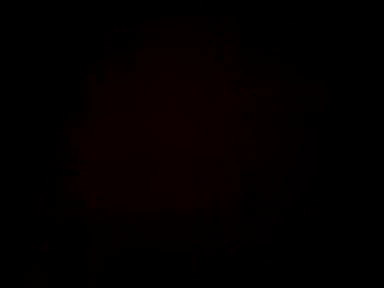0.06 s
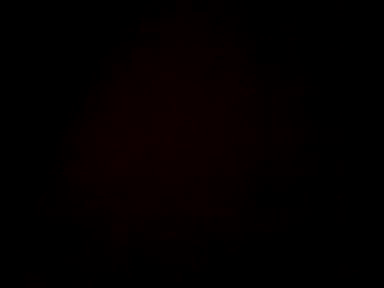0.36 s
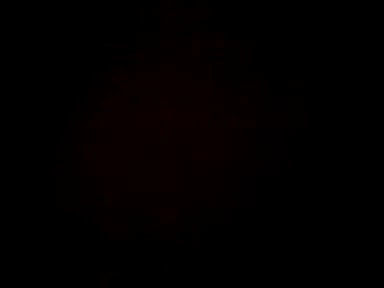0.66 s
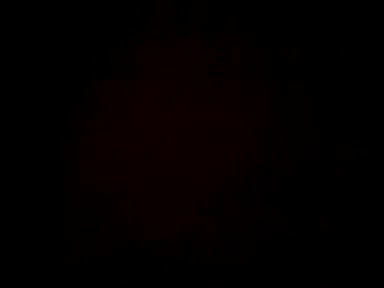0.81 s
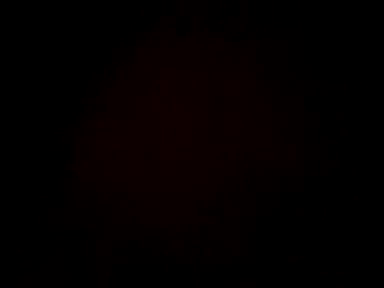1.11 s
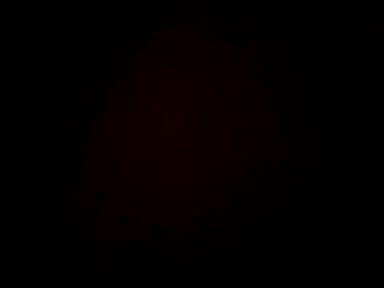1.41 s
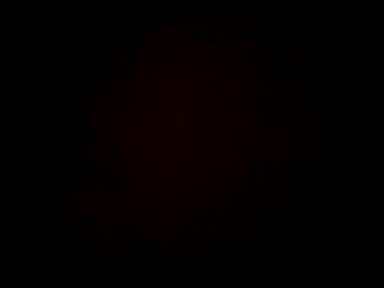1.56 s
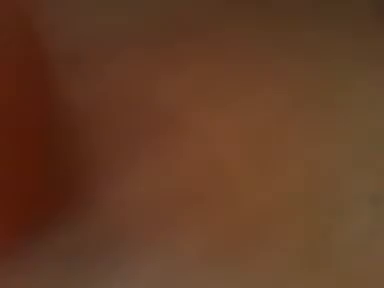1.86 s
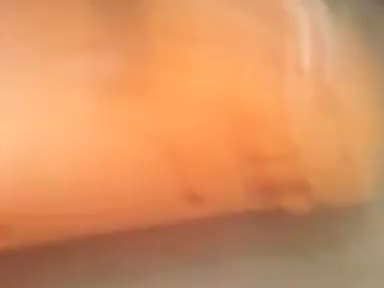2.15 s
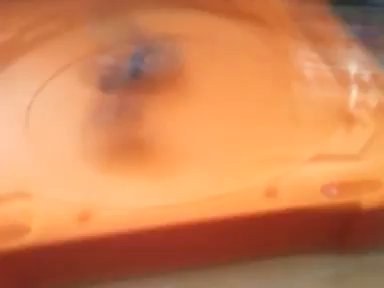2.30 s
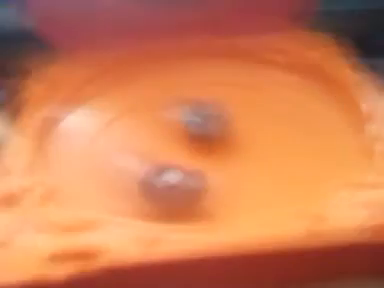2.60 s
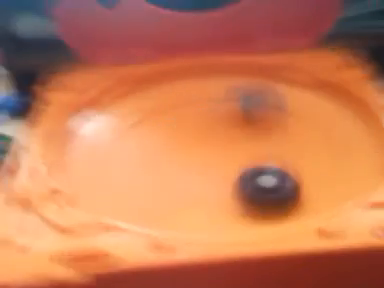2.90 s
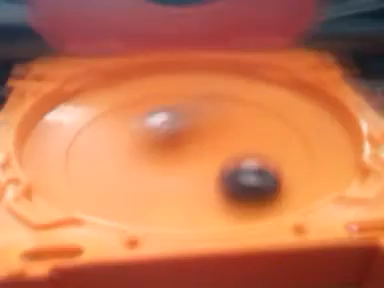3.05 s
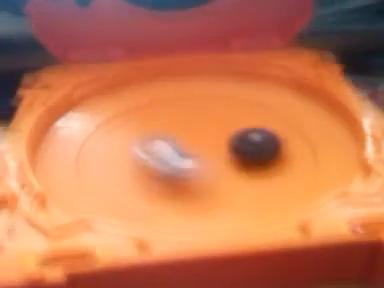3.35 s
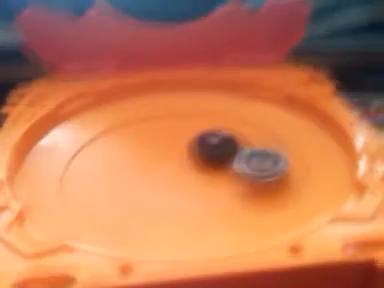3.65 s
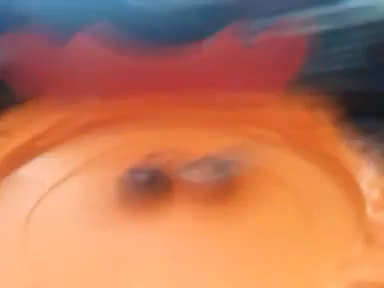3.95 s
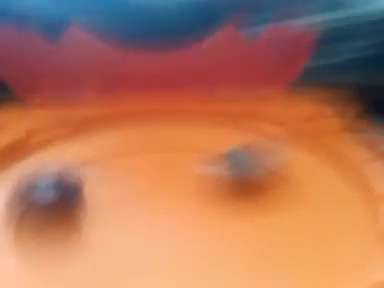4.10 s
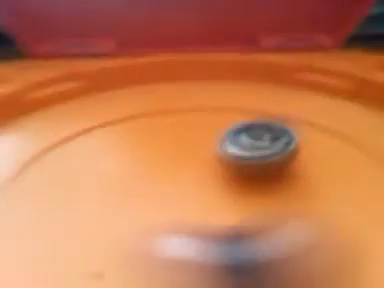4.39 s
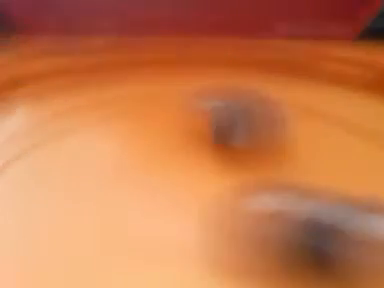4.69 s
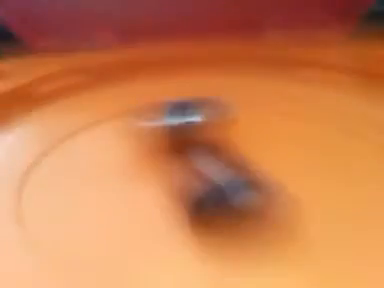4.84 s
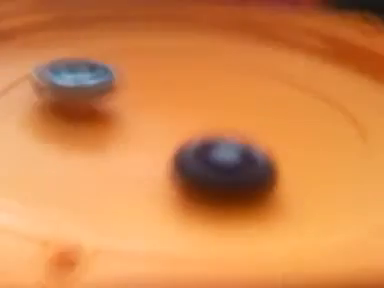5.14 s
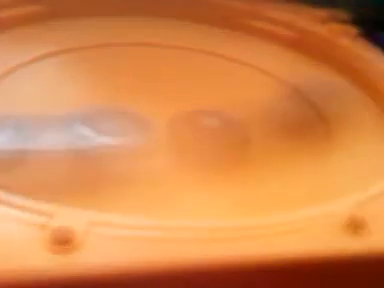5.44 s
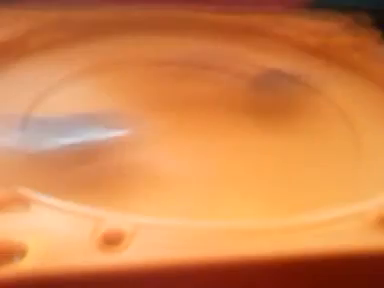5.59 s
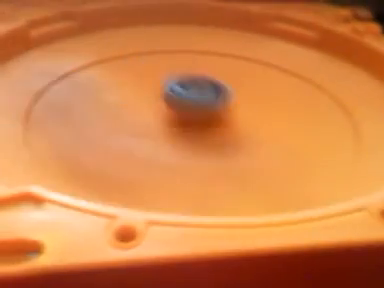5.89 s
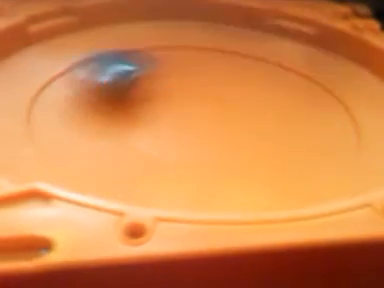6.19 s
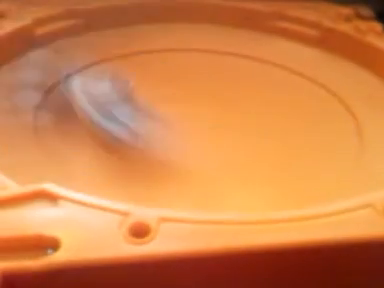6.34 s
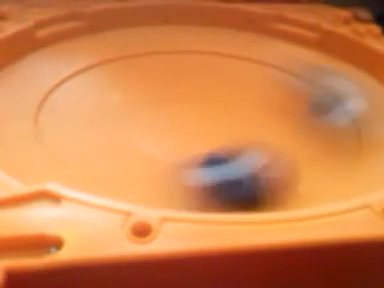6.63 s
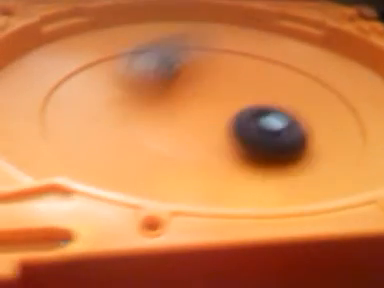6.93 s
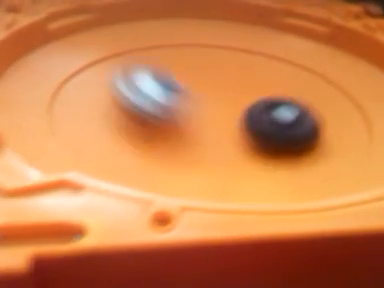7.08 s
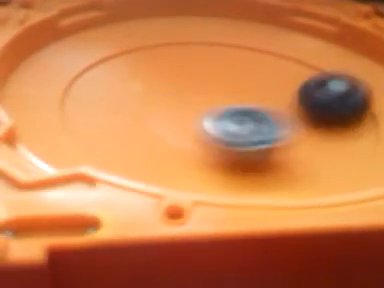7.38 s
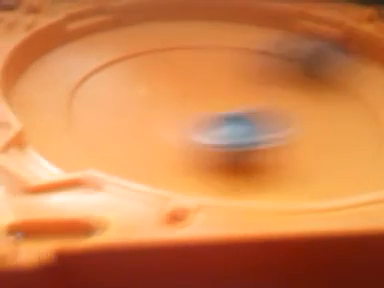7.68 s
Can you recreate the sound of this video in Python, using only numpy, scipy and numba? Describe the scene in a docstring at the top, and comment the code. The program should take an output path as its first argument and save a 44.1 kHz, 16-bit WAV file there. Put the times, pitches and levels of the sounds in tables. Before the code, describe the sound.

A few light knocks and a short, loud ripcord zip launch two metal spinning tops into a plastic arena. They clash rapidly with hollow clacks, ease into a drumming whirr with little skipping rattles, then collide again in further flurries before thinning to occasional knocks. The microphone is close in a small, quiet room, and the sound is narrow, with little treble.

```python
"""Two metal spinning tops clash and skip in a plastic arena, ripped off a launcher's toothed cord.
Each impact excites the damped modes of the plastic bowl, and the tops rebound in ever shorter hops.
Between blows their tips tap the floor once a turn and rub, a periodic force that drums the bowl.
A small room reverberates. A close phone keeps a narrow voice band and clips on the hardest blows."""
import sys
import numpy as np
from scipy import signal
from scipy.fft import rfft, irfft
from scipy.io import wavfile
from scipy.ndimage import uniform_filter1d
from numba import njit

SR = 44100
rng = np.random.default_rng(int(sys.argv[2]) if len(sys.argv) > 2 else 0)


def wav_out(sig):
    """Save sig, one row per channel (or a flat mono array), as 16-bit PCM at SR to the path in sys.argv[1]."""
    wavfile.write(sys.argv[1], SR, np.round(np.clip(np.atleast_2d(sig).T, -1, 1) * 32767).astype(np.int16))


N = 342657
TIME = np.arange(N) / SR

# Knocks at the launch, then blows of the tops on each other and the bowl; floor blows thud more.
# Each row: start in seconds, contact time in ms, strongest mode in Hz, level in dB,
# brightness in dB per octave, thud in dB.
BLOWS = [(0.408, 5, 777, -29.5, -0.5, -0.5), (0.459, 9, 745, -38.5, -0.5, -29),
         (0.522, 6.3, 740, -25.5, -1, -15), (0.552, 4.0, 982, -28, 1, -17), (0.624, 11, 480, -5.0, 1, 9),
         (0.657, 6.0, 673, -11, -1.5, 3), (0.692, 7.1, 730.0, -21, 0.5, 15.5),
         (0.721, 10.0, 716, -19.5, -5.0, -2), (0.755, 16, 726, -19, -1, 3),
         (0.859, 6.6, 831, -15.5, -4.5, -2.5), (1.003, 16, 728, -13.5, 0, 4.5),
         (1.037, 26, 723.6, -18.5, 0, 5), (1.06, 8.7, 682, -8.0, -3, -7), (1.078, 9.8, 782, -7.5, 1, 3),
         (1.088, 9.0, 912, -6.5, -5.5, -5.5), (1.14, 14.0, 343, -12.5, 2.5, 8.5),
         (1.158, 1.3, 764, -17.5, 0, 7), (1.21, 15, 484, -14.5, 0.5, 3),
         (1.233, 5.2, 905, -6.5, -4.5, -1.5), (1.241, 5.4, 373, -4, 6, -2.5),
         (1.255, 8, 1118, -12.5, -8.5, 4), (1.269, 8.1, 398.5, -16.5, 0.5, -4.5),
         (1.395, 8.0, 809, -11.5, 2, 9.5), (1.404, 7.1, 758, -8.0, -4, 1.5),
         (1.417, 19, 666, -20.5, -1, -1.5), (1.441, 12, 670, -8.5, 0.5, 5.5),
         (1.476, 5.4, 720.0, -15, -5, 1.5), (1.539, 12, 728, -19, 1, 13),
         (1.579, 14.0, 1135, -10.0, -3.5, 5.5), (1.593, 18.0, 491, -15, 0, -3.5),
         (1.615, 28, 933, -19.5, -0.5, 4), (1.649, 6.4, 875, -8.5, -3.5, 3.5),
         (1.66, 10, 887, -9.0, 1, 3.5), (1.704, 14.0, 626, -26, 5.5, 4),
         (1.721, 7.4, 774, -13.5, -3, -15.5), (1.758, 10, 436, -18, -2.5, -6.5),
         (1.784, 9.0, 508, -10.5, -1.5, -2.5), (1.813, 9.8, 471, -29.5, -10, -8),
         (1.875, 7.2, 364, -16.5, -2.5, -0.5), (1.932, 13.0, 1795, -7.0, -3, -2),
         (1.945, 12, 507, -9.5, 3.5, 8.5), (1.995, 4, 527, -15.5, 1, 12.5),
         (2.053, 3.3, 450.0, -25, -2.5, 5.5), (2.109, 22, 506, -16, 1.5, 4),
         (2.148, 8.0, 438, -27, -1, 6.5), (2.266, 8.0, 444, -10.5, 0, 1.5),
         (2.347, 2.2, 1980, -11.0, -1, -4), (2.355, 6.3, 1073, -7.0, -0.5, 0),
         (2.481, 3, 693, -10, 1.5, 13), (2.49, 17, 643, -21.5, 2.5, -5.5), (2.7, 6.2, 2066, -30, 5.5, 24.5),
         (3.902, 6.9, 470, -15.5, 4, -5), (3.936, 7.0, 473, -18, 0, 6), (3.967, 12.0, 543, -11.5, 3, -3.5),
         (4.017, 7.5, 565, -18, -1.5, 2), (4.472, 4, 412, -14.0, 8.5, 23),
         (4.533, 9.0, 966, -12.0, -2.0, -15), (4.584, 7.0, 1070, -15.0, -3, 0.5),
         (4.83, 7.0, 517, -13.5, 5, 10), (4.876, 15, 410.0, -17, 1.0, -2.5),
         (5.296, 13.0, 490, -18, -2.5, -7), (5.338, 17, 544, -13.5, 5.5, 5),
         (5.368, 4.2, 1080, -11.0, -2, 1), (5.397, 6.9, 1897, -11.5, -1, -4.5),
         (5.407, 6.7, 1883, -11, -9, -16), (5.448, 24, 407, -16.5, 5.5, 2),
         (5.479, 9.0, 541, -9.5, 0.0, -7), (5.511, 8.7, 347, -23, 6.5, 8.5),
         (5.572, 7.0, 558, -11.5, -5.5, -8.5), (5.582, 6.3, 510, -10, 2, -14.5),
         (5.664, 8.5, 546, -11, 1, -12.5), (5.705, 11.0, 586, -10.5, 1.5, 11.5),
         (5.791, 16.0, 1448, -13.5, -1.5, -3), (5.837, 39, 1246, -23, 2.5, 3),
         (5.848, 6, 463, -16.0, -2, 3), (5.883, 21, 979, -20.5, -7, -11), (5.899, 8.0, 940, -11.5, 0.5, 0),
         (5.98, 10.0, 553, -18.5, -6.5, -14), (5.989, 9.4, 548, -11.5, 0.5, -10),
         (6.025, 8.6, 529, -11.0, -1.5, -15), (6.08, 14, 415, -15.0, 2, -12),
         (6.099, 5.9, 539, -10.5, -3.0, -14), (6.18, 6.8, 810, -10, -2, -3.5),
         (6.217, 4.6, 548, -11.5, -0.5, -19.5), (6.32, 8.9, 1175, -21.0, -3.5, -12.5),
         (6.35, 3.8, 880.0, -17, -1.0, -6.5), (6.563, 9.2, 445, -16.5, -1.0, 4),
         (6.699, 7.0, 568, -23, -6, -10.5), (7.155, 3, 450.0, -21.5, 6.5, 23.5),
         (7.289, 3.4, 427, -23.0, -1.5, 7), (7.452, 5.6, 392.5, -21.5, 10, 31.5)]
def clashes():
    """Impact excitation: each collision gives the bowl a brief, broadband push."""
    return impacts(BLOWS)


# Runs of hops of a knocked top. Each row: start in seconds, first hop in seconds, share kept by the
# next hop, number of landings, level in dB, fade in dB per landing, strongest mode in Hz,
# brightness in dB per octave.
SKIPS = [(.782, 0.019, .98, 3, -26, -3, 652, -1), (0.884, 0.026, 1, 4, -15, 5, 716, -0.5),
         (1.284, .03, .97, 4, -15, 2, 592, 1.5), (2.571, .059, .79, 6, -18, 1.7, 450, -.5),
         (2.796, .044, 0.81, 6, -24, 1, 515, -1), (3.633, .033, .88, 6, -21.5, 1.5, 428.4, 0),
         (4.058, .059, .74, 6, -16.5, 1.4, 402, 0), (4.621, 0.041, .78, 5, -16, 3, 411, 2.5),
         (4.928, .031, .98, 5, -18, 2.5, 417, 0), (6.237, .031, .9, 2, -21, 1.5, 385, 4),
         (6.381, 0.029, .8, 3, -22.5, 0.5, 514, 0.5), (6.501, .039, .85, 5, -23.5, .5, 450, 3),
         (7.49, .034, .6, 3, -17, 5, 463, 1), (7.596, .026, .9, 2, -18.5, 4.5, 440, -1.5)]
def skips(contact_ms=6.5, thud_db=0.5):
    """Inelastic rebound: as a top loses energy, its landings come sooner and weaker."""
    rows = []
    for start, hop_s, kept, count, db, fade_db, main_hz, bright_db in SKIPS:
        for k in range(round(count)):
            note_hz = main_hz * np.exp(0.11 * rng.standard_normal())
            rows.append((start, contact_ms, note_hz, db - fade_db * k, bright_db, thud_db))
            start += hop_s * kept ** k
    return impacts(rows)


def contact(length_s, main_hz, chatter_per_s=1500, crack_s=0.0094, main_width_hz=140):
    """Impulse response: a first touch and a fading chatter of rims ring the bowl and crack the metal."""
    t = TIME[:2048]
    spot, detune = rng.standard_normal((2, len(BOWL_MODES)))
    grit, crack = rng.standard_normal((2, len(t)))
    pressure = (t < length_s) * np.exp(-0.68 * t / length_s)
    force = undb(-7) * pressure * grit * (rng.random(len(t)) < chatter_per_s / SR)
    force[0] = 1
    # the spot that is struck weights the modes
    body = unit((np.sign(spot) + spot / 2) @ bowl(t, 0.044 * detune[:, None]))
    clatter = ring(force, body + undb(-8) * unit(crack * np.exp(-t / crack_s)))
    # one mode is kept ringing while the rims touch and dies when they part
    envelope = ring(np.abs(force), np.exp(-np.pi * main_width_hz * t))
    main = np.sin(2 * np.pi * main_hz * t) * envelope
    return unit(clatter) + undb(-5) * unit(main)


# Registers of a blow: thud, body, knock, clack, tick. Each row: lower edge in Hz, upper edge in Hz.
REGISTERS = [(110, 370), (370, 700), (700, 1300), (1300, 2300), (2300, 3650)]
def impacts(rows, register_db=(-4, 0.5, 1.5, 2.1, -0.5), fall_db_per_octave=6):
    """Spectral envelope: energy gathers near the strongest mode, tilted by each blow's brightness."""
    starts, contact_ms, mains_hz, level_db, bright_db, thud_db = np.transpose(rows)
    contact_s = np.maximum(contact_ms, 2) * 1e-3
    sounds = np.array([contact(s, hz) for s, hz in zip(contact_s, mains_hz)])
    shaped = 0
    for (lo, hi), trim_db in zip(REGISTERS, register_db):
        centre_hz = np.sqrt(lo * hi)
        db = level_db + trim_db + bright_db * np.log2(centre_hz / 1000)
        db -= fall_db_per_octave * np.abs(np.log2(centre_hz / mains_hz))
        if lo == REGISTERS[0][0]:
            db += thud_db
        part = band(sounds, lo, hi)
        strength = np.sqrt(np.sum(part ** 2, axis=1) / (contact_s * SR))
        shaped = shaped + part * (undb(db) / strength)[:, None]
    hits = np.zeros(N)
    for start, sound in zip((starts * SR).astype(int), shaped):
        hits[start:start + len(sound)] += sound[:N - start]
    # the whole arena rocks a little under the blows
    load = np.abs(band(hits, 130, 450, order=2))
    return hits + undb(-12) * band(load, 55, 97, order=2)


# Modes of the plastic bowl. Each row: frequency in Hz, bandwidth in Hz, relative level in dB.
BOWL_MODES = [(238, 110, -13), (316, 85, -2.5), (450, 109, -4.5), (570, 270, -2.5), (698, 160, -7),
              (881.5, 99, 1), (1018, 60, -2.5), (1185, 159, -2), (1477, 230, -0.5), (1780, 120, -5),
              (2120, 290, 2), (2315, 310, -6), (2639, 160, 0), (3160, 96, -9.5), (3670, 140, -34.5)]
def bowl(t, detune):
    """Damped free vibration: one decaying sine a mode, dying faster the wider its bandwidth."""
    hz, width, db = np.transpose(BOWL_MODES)[:, :, None]
    return undb(db) * np.sin(2 * np.pi * hz * (1 + detune) * t) * np.exp(-np.pi * width * t)


# Spectral envelope of the running tips. Each row: frequency in Hz, gain in dB.
TIP_SPECTRUM = [(30, -23.5), (100, -8.5), (160, -8.5), (205, 0.5), (300, 1), (520, -3.5), (750, -10),
                (1200, -6.5), (1500, -17), (2200, -12.5), (2800, -18.5), (3200, -22), (3600, -31.5),
                (4200, -38.5)]
# Hollow note of the floor where the tops run. Each row: time in seconds, frequency in Hz.
FLOOR_NOTE = [(1.7, 630), (2.2, 440), (3.3, 520), (3.7, 390), (4.6, 470), (5.2, 370), (5.9, 550),
              (6.5, 420), (7.7, 410)]
# Relative levels of the tips. Each row: time in seconds, drumming, rubbing and scratching in dB.
TIP_LEVELS = [(0.62, -41, -43, -35), (0.72, -31.5, -32, -49), (0.8, -30, -39, -45),
              (1.1, -32.5, -34.5, -60.5), (1.21, -35, -44, -34.5), (1.6, -42, -49, -50),
              (1.7, -29, -38, -50), (1.83, -36.5, -29.5, -44), (2.07, -40, -41.5, -40),
              (2.35, -40.5, -45.5, -55.5), (2.51, -41.5, -41, -48), (2.77, -33, -39, -43.5),
              (3.01, -37.5, -39, -49.5), (3.51, -40.5, -42, -49.5), (4.0, -37.5, -43, -44),
              (4.1, -34, -44, -46), (4.32, -31, -33, -39), (4.82, -29, -37.5, -43.5),
              (5.1, -31.5, -37, -43.5), (5.34, -36.5, -47, -49), (5.5, -29.5, -38, -35),
              (5.72, -37, -35, -46), (5.88, -34, -34.5, -41), (6.45, -32, -34.5, -44),
              (6.65, -35, -42, -46), (6.89, -33.5, -39.5, -44), (7.29, -33.5, -39, -48),
              (7.77, -33.5, -38, -46.5)]
def whirr(turns_per_s=122, spin_down_s=18.5):
    """Forced vibration: both tips drive the bowl, which drums, rubs and scratches."""
    spin = turns_per_s * np.exp(-TIME / spin_down_s)  # the steadier top slows by friction
    roaming = tip(tap_rate(), jitter=.05, scatter_db=2.46, rub_db=4, rub_turns=0.65)
    steady = tip(spin, jitter=.04, scatter_db=5.5, rub_db=-3, rub_turns=0.17)
    force = roaming + undb(-8) * steady
    # the circling tops cross nodes and antinodes, so each mode swells and fades on its own
    modes = sum(wander(6) * ring(force, unit(mode)) for mode in bowl(TIME[:2048], 0))
    sound = colour(unit(band(force, 40, 6200, order=1)) + undb(2) * unit(modes), TIP_SPECTRUM)
    sound += undb(1) * resonance(sound, curves(FLOOR_NOTE)[0], width_hz=130.)
    bands_hz = [(30, 700), (700, 1600), (1600, 4000)]
    running = 0
    for (lo, hi), db, trim_db in zip(bands_hz, curves(TIP_LEVELS), (2.5, 0, -1)):
        running += even(band(sound, lo, hi)) * undb(db + trim_db + wander(9))
    landed = np.clip((TIME - .61) / .02, 0, 1)
    return landed * running


def tip(rate_hz, jitter, scatter_db, rub_db, rub_turns):
    """Impulse train with friction noise: a tip taps once a cycle, then rubs until it lifts again."""
    chance = rng.standard_normal((1200, 2))
    cycle = np.cumsum(rate_hz) / SR
    cycle += jitter * np.interp(cycle, np.arange(len(chance)), chance[:, 0])
    count = np.clip(cycle.astype(int), 0, len(chance) - 1)
    size = undb(scatter_db * chance[count, 1])
    taps = np.diff(count, prepend=count[0]) * size
    rub = size * np.exp(-(cycle % 1) / rub_turns) * rng.standard_normal(N)
    return unit(taps) + undb(rub_db) * band(unit(rub), 600, 4500, order=1)


def tap_rate(settled_per_s=82, hop_stretch=4, settle_s=.45):
    """Exponential relaxation: a blow stretches the roaming top's hops; taps quicken as it settles."""
    unrest = np.zeros(N)
    for start, _, _, db, *_ in BLOWS:
        at = int(start * SR)
        unrest[at:] = np.maximum(unrest[at:], undb(db) * np.exp(-TIME[:N - at] / settle_s))
    return settled_per_s / (1 + hop_stretch * unrest)


# Pull on the launcher's cord. Each row: time in seconds, level in dB, teeth per second.
CORD_PULL = [(.54, -63, 150), (.575, -36, 266), (.6, -19.5, 630), (.62, -5, 1120), (.635, -20, 820),
             (.66, -60, 410), (.72, -53, 560)]
def launcher():
    """Tooth-passing frequency: each tooth crossing the gear makes a noise burst; they fuse to a zip."""
    db, teeth_hz = curves(CORD_PULL)
    pulling = (TIME > CORD_PULL[0][0]) & (TIME < CORD_PULL[-1][0])
    phase = np.cumsum(teeth_hz) / SR % 1
    teeth = np.exp(-phase / 0.45) * rng.standard_normal(N)
    zipping = colour(teeth, [(300, -15), (1200, -11), (1900, 2), (2500, -6), (3300, 2), (4200, -8)])
    return pulling * undb(db) * unit(zipping)


def room(x, build_s=0.0014, bass_t60_s=0.21, treble_t60_s=0.2):
    """Reverberation: dense reflections in a small furnished room build up and fade, the treble first."""
    t = TIME[:SR // 2]
    noise = rng.standard_normal(len(t)) * (1 - np.exp(-(t / build_s) ** 2))
    low = signal.sosfilt(signal.butter(1, 1200, fs=SR, output="sos"), noise)
    tail = low * undb(-60 * t / bass_t60_s) + (noise - low) * undb(-60 * t / treble_t60_s)
    wet = ring(x, tail / np.linalg.norm(tail))
    return colour(wet, [(60, 6), (140, 7), (210, -1), (500, 1), (1000, 1.5), (2200, 2.5), (4000, -1.5)])


# Spectrum of the quiet room. Each row: frequency in Hz, relative level in dB.
AIR_SPECTRUM = [(18, -73), (30, -38.5), (232, 3.5), (274, -7), (415, -12.5), (601, -10), (755, -4),
                (1430, -20), (2500, -23), (3140, -30.5), (3600, -47), (4200, -64), (5460, -84.5),
                (9240, -120)]
def air(level_db=-47.5):
    """Ambient noise: a faint, steady hush, strongest in the bass."""
    return undb(level_db) * unit(colour(rng.standard_normal(N), AIR_SPECTRUM))


def undb(db):
    """Decibels to amplitude ratio."""
    return 10 ** (np.asarray(db) / 20)


def unit(x):
    """Normalisation to rms 1."""
    return x / np.sqrt(np.mean(x ** 2) + 1e-18)


def even(x):
    """Running normalisation to rms 1 over a tenth of a second."""
    return x / np.sqrt(uniform_filter1d(x ** 2, SR // 10) + 1e-9)


def curves(table):
    """Linear interpolation of each column of a time table."""
    s, *columns = np.transpose(table)
    return [np.interp(TIME, s, c) for c in columns]


def wander(per_s):
    """Random modulation: glides to a new value per_s times a second, with a spread near 1."""
    levels = rng.standard_normal(400)
    return np.interp(TIME * per_s, np.arange(len(levels)), levels)


def band(x, lo_hz, hi_hz, order=3):
    """Causal band-pass filtering."""
    return signal.sosfilt(signal.butter(order, [lo_hz, hi_hz], "band", fs=SR, output="sos"), x)


def colour(x, points):
    """Minimum-phase filtering through (Hz, dB) points, built from the cepstrum."""
    hz, db = np.transpose(points)
    size = 4096
    gain = undb(np.interp(np.log(np.fft.rfftfreq(size, 1 / SR) + 1), np.log(hz), db))
    cepstrum = irfft(np.log(gain)) * (1 + np.sign(size / 2 - np.arange(size)))
    cepstrum[0] /= 2
    return ring(x, irfft(np.exp(rfft(cepstrum))))


def ring(x, response):
    """Convolution with an impulse response."""
    return signal.oaconvolve(x, response)[:len(x)]


@njit
def resonance(x, hz, width_hz):
    """Moving resonance: a state-variable band-pass with gain 1 at its centre."""
    y, mid, low = np.empty(len(x)), 0., 0.
    for i in range(len(x)):
        g, damping = np.tan(np.pi * hz[i] / SR), width_hz / hz[i]
        v = (mid + g * (x[i] - low)) / (1 + g * (g + damping))
        mid, low = 2 * v - mid, low + 2 * g * v
        y[i] = damping * v
    return y


def scene():
    """Superposition: the tops and launcher, their reverberation and the room's hush add up."""
    direct = clashes() + skips() + whirr() + launcher()
    return (direct + air() + undb(-13.5) * room(direct))[None]


def record(dry, voice_band_hz=4020, clip_level=0.72, top_hz=16200):
    """Clipping distortion: the phone keeps a voice band, then clips; hard blows spit treble above it."""
    low_pass = signal.firwin(101, voice_band_hz, window=("kaiser", 8), fs=SR)
    narrow = signal.fftconvolve(dry, low_pass[None], "same")
    clipped = np.clip(narrow, -clip_level, clip_level)
    return signal.sosfilt(signal.ellip(8, .2, 70, top_hz, fs=SR, output="sos"), clipped)


dry = scene()
out = record(dry)
wav_out(out)
```